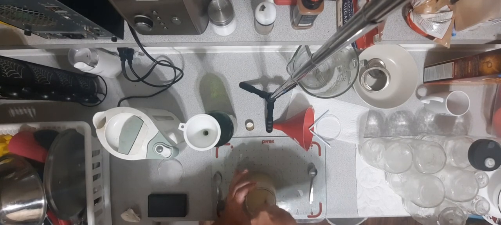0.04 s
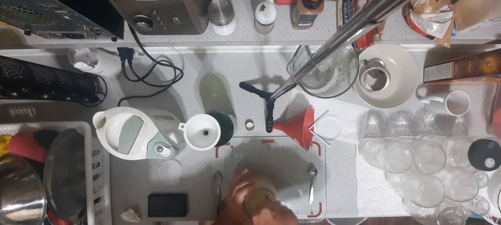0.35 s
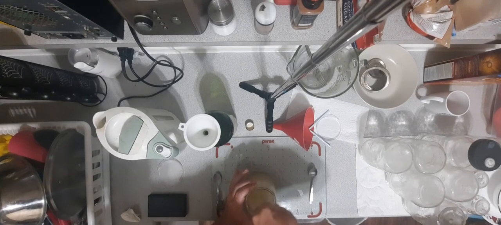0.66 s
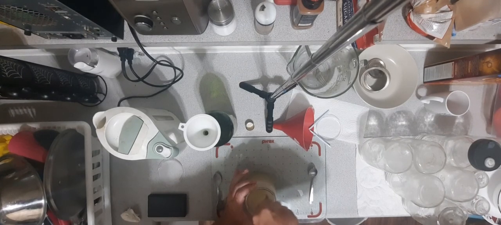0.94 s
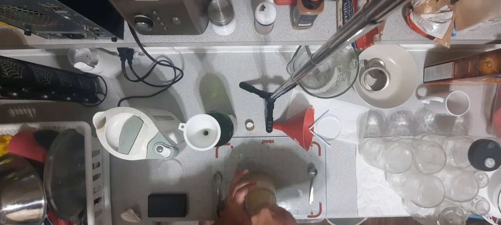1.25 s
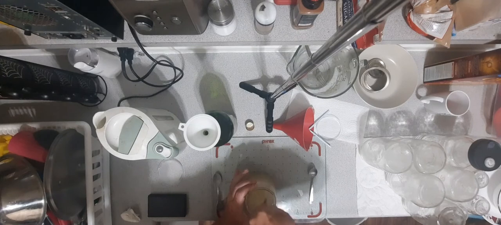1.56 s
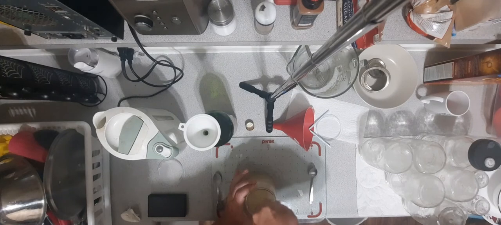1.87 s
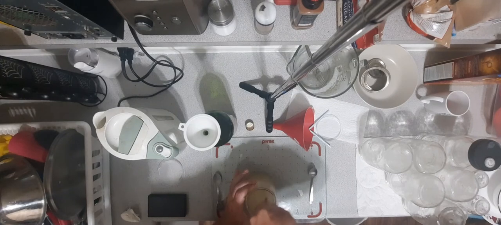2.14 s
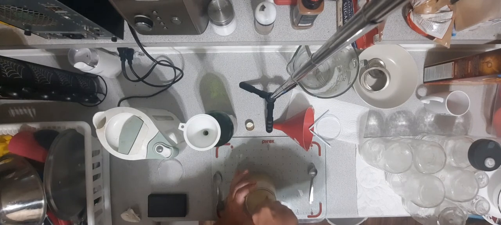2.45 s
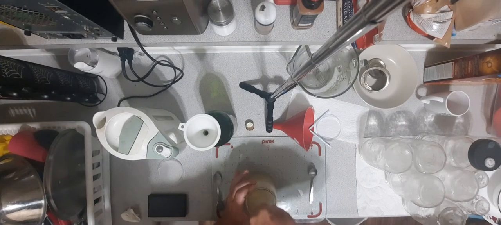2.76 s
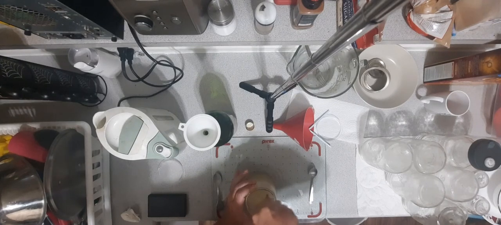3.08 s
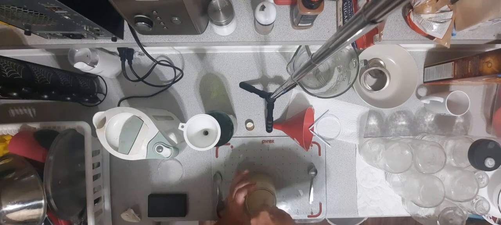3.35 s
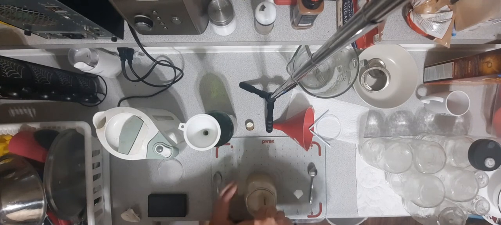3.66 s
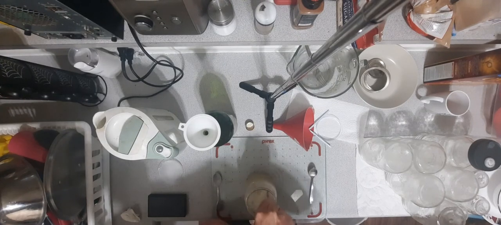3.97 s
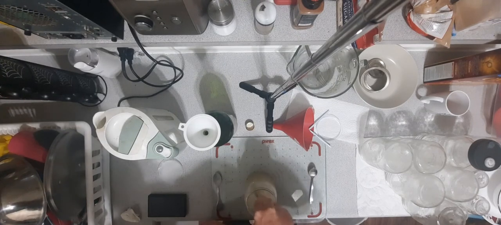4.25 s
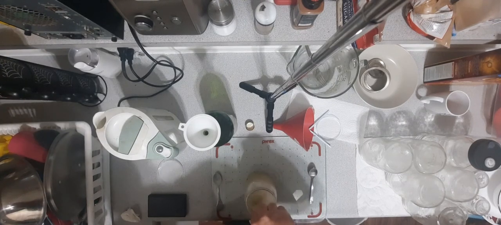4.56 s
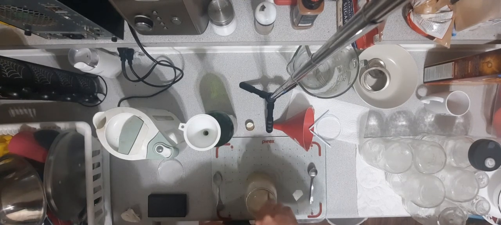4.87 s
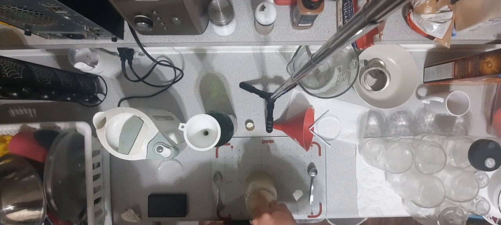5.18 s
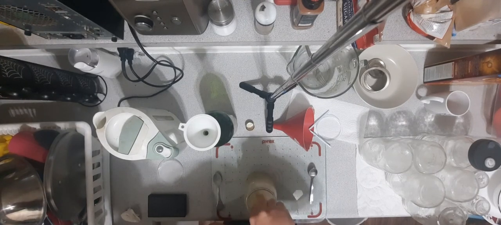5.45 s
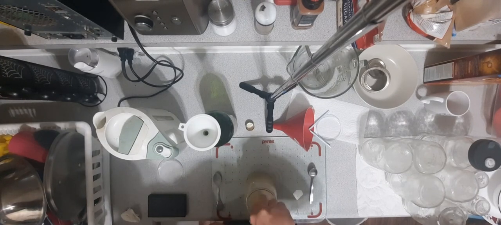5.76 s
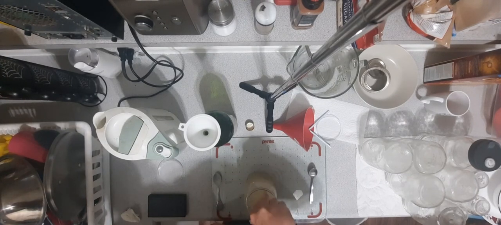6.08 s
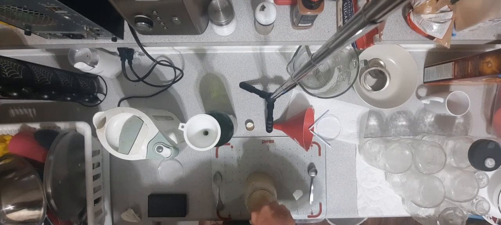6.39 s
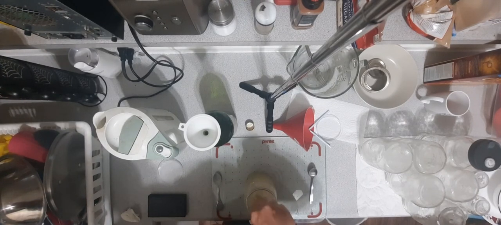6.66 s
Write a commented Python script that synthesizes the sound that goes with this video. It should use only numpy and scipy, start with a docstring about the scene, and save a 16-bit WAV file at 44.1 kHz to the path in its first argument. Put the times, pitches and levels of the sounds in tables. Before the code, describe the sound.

Liquid sloshes around in a glass jar, with hollow glugs, bubbles and drops slapping the glass. It settles, and after a short pause a metal spoon stirs quickly, knocking, scraping and clinking in the jar. The steel sink underneath booms softly with the waves and knocks. The sound is close, in a small, hard kitchen with a faint appliance hum.

```python
"""Glass jar in a steel sink

Churned liquid sloshes in a jar: trapped air glugs, bubbles ring, thrown drops slap the glass.
It settles, and after a pause a metal spoon stirs quickly, knocking, scraping and clinking.
Waves and knocks set the steel basin booming underneath. A hard little kitchen answers,
and an appliance hums faintly throughout."""
import sys
import numpy as np
from scipy import signal
from scipy.fft import rfft, irfft, next_fast_len
from scipy.io import wavfile
from scipy.ndimage import map_coordinates

SR = 44100
rng = np.random.default_rng(int(sys.argv[2]) if len(sys.argv) > 2 else 0)


def transcribe(signal):
    """Save signal, clipped to [-1, 1], as a 16-bit WAV file at the path in sys.argv[1]."""
    frames = np.atleast_2d(signal).T
    limited = np.clip(frames, -1, 1)
    pcm = np.round(limited * 32767).astype(np.int16)
    wavfile.write(sys.argv[1], SR, pcm)


N = 300762

# Cue levels are faders: each layer adds its own trim.
# how briskly the liquid swirls between waves, until it settles: time_s, level_db
SWIRL_LEVEL = [(0, -38.5), (.4, -44.5), (1.3, -39.5), (2.3, -44), (3.4, -41), (3.52, -50.5), (3.7, -77)]
# waves breaking on the jar's wall: start_s, hold_s, weight_db, splash_db, spray_db
WAVE_CUES = [(0.01, 0.022, -42, -32, -61), (0.14, 0.017, -34, -31, -35), (0.279, .01, -37, -34, -41),
             (0.335, 0.18, -34.5, -34, -38), (0.52, 0.017, -41, -49, -60), (0.744, 0.015, -36.5, -34, -63),
             (0.85, 0.015, -28, -32, -45), (0.874, .02, -45, -27, -45), (0.993, 0.0088, -30, -44, -56),
             (1.057, 0.072, -30.5, -37, -55), (1.228, 0.037, -32.5, -47, -52),
             (1.396, 0.022, -32.5, -30.5, -44), (1.594, 0.066, -34, -33, -57.5),
             (1.816, 0.14, -33.5, -34, -36), (2, 0.069, -36, -44, -50), (2.201, 0.039, -41, -37, -42),
             (2.387, 0.047, -33, -35, -38), (2.557, 0.0077, -32, -52, -59),
             (2.66, 0.023, -38.5, -34, -38.5), (2.852, 0.0078, -60, -58, -44), (3.03, 0.097, -39, -38, -51),
             (3.2, 0.036, -42, -32, -42), (3.256, 0.067, -36, -52, -43), (3.377, 0.011, -36.5, -31, -54)]
# fader ride of the wet crackle: time_s, level_db
CRACKLE_LEVEL = [(0, -46.5), (.35, -47.5), (.6, -54.5), (.8, -50), (1.1, -48), (2, -51), (2.75, -55),
                 (2.95, -49), (3.2, -45), (3.4, -48), (3.52, -64), (3.7, -85), (4.55, -85), (4.8, -57),
                 (5.3, -58), (5.6, -72), (6.8, -47)]
# thrown liquid hitting the glass: start_s, slap_db, snap_db, spit_db
SPLAT_CUES = [(.02, -39.5, -58, -57), (.147, -37.5, -44, -50), (0.159, -46, -54, -49),
              (0.232, -34.5, -47, -66), (0.279, -42, -40.5, -54), (.294, -34.5, -39.5, -51),
              (0.344, -44, -47, -58), (0.357, -37.5, -45, -44.5), (.528, -44, -55, -54.5),
              (.578, -58, -57, -68), (.733, -43, -47.5, -53), (0.852, -39, -43, -40.5),
              (.866, -32.5, -39, -37.5), (.896, -36, -39, -39.5), (1.054, -55, -56, -51.5),
              (1.235, -45, -50, -46.5), (1.265, -41.5, -51, -67), (1.389, -46, -50, -61),
              (1.407, -40, -47, -60), (1.443, -40, -45, -62), (1.548, -49, -55, -51),
              (1.686, -57, -50.5, -56.5), (1.805, -32, -34.5, -41.5), (1.839, -36, -39, -50),
              (2.003, -39, -45, -42.5), (2.022, -36, -47, -62), (2.07, -46, -51, -51),
              (2.2, -33.5, -38, -47), (2.225, -37, -36.5, -50), (2.36, -39, -54, -57),
              (2.4, -33.5, -37.5, -44.5), (2.421, -37, -41, -60), (2.657, -44, -45, -44.5),
              (2.859, -54, -45.5, -48.5), (3.046, -44, -42.5, -46.5), (3.181, -41, -41, -52),
              (3.275, -50, -50, -46.5), (3.336, -35, -49, -55), (3.393, -39, -46, -53),
              (3.413, -42, -47.5, -51)]
# the swirl closing on a pocket of air: start_s, level_db, pitch_hz
GLUG_CUES = [(0.118, -39, 842), (0.147, -22.5, 842), (0.231, -20, 832), (0.257, -31, 866),
             (0.314, -26, 880), (0.347, -28.5, 860), (0.428, -27, 830), (0.509, -28, 840),
             (0.534, -33, 820), (0.614, -29, 827), (0.696, -29, 818), (0.732, -31.5, 856),
             (0.868, -31.5, 753), (1.186, -26, 837), (1.261, -23, 849), (1.407, -28, 804), (1.45, -27, 860),
             (1.628, -28.5, 798), (1.762, -30.5, 824), (1.86, -42, 855), (2.021, -30, 730),
             (2.07, -33.5, 820), (2.148, -26.5, 830), (2.367, -35, 835), (2.43, -32, 830),
             (2.633, -28, 805), (2.815, -35, 830), (2.86, -30, 814), (2.938, -28, 814), (3.011, -30.5, 840),
             (3.045, -30.5, 840), (3.115, -29, 800), (3.153, -27, 826), (3.267, -24.5, 832),
             (3.334, -35, 710)]
# air pockets breaking into bubbles: start_s, length_s, centre_hz, level_db
GURGLE_CUES = [(0.277, 0.021, 1900, -36.5), (0.548, 0.016, 1870, -49), (1.021, .022, 1570, -41),
               (1.262, 0.022, 1920, -50), (1.37, .045, 2210, -38), (1.569, 0.063, 1590, -44),
               (1.97, 0.023, 1390, -33), (2.568, 0.022, 1450, -42), (2.945, 0.055, 1600, -37),
               (3.122, 0.044, 1400, -41), (3.203, 0.02, 2020, -38.5)]
# single bubbles ringing above the rest: start_s, pitch_hz, level_db
PLIP_CUES = [(.278, 1580, -37), (.668, 1290, -44), (1.025, 1580, -36.5), (1.772, 2070, -35),
             (1.806, 1336, -31.5), (1.982, 2530, -41.5), (2.199, 1580, -31.5), (2.779, 1580, -44),
             (2.965, 1620, -39), (3.16, 1580, -39), (3.311, 2000, -40), (3.328, 1980, -40),
             (3.41, 1570, -36)]
# heavy waves and hard knocks jolting the jar against the basin: start_s, boom_db
JOLT_CUES = [(0.869, -37), (1.603, -38), (1.843, -43), (4.805, -40), (5.085, -38.5), (5.228, -49),
             (5.41, -44), (5.561, -57), (5.859, -54)]
# spoon on glass; hollow, wall and hardness are relative to the strength:
# start_s, strength_db, hollow_db, wall_db, hardness_db, hollow_hz
KNOCK_CUES = [(4.582, -59.5, 12, -7, -4, 785), (4.625, -53, -5, -18, -8, 830),
              (4.702, -58.5, 22, 7, -10, 820), (4.79, -29, 5, -5.5, -9, 842),
              (5.005, -45, -8, -14.5, -7, 830), (5.078, -27, -1, -10, 1.5, 870),
              (5.218, -33, 1, -26, -4, 1032), (5.346, -36.5, -0.5, 4, 0.5, 880),
              (5.401, -33.5, 3.5, 0, -2.5, 1018), (5.48, -51.5, 17.5, 0, -14, 833),
              (5.515, -28.5, 3, -10, -2.5, 1008), (5.56, -26, 5, 7.5, 1, 804), (5.564, -27.5, 3, 6, 1, 820),
              (5.576, -34, 5, 2, 0, 830), (5.639, -30, -8, -6, -5, 836), (5.703, -31, -8, -1, -2, 990),
              (5.81, -25, 1, -3.5, -8.5, 1030), (5.852, -29.5, 8, 8.5, -2.5, 802),
              (5.858, -30, 2, 8, -5, 820), (5.871, -54, 11, -6, -2, 830), (5.9, -36.5, -6, -7, -2.5, 830),
              (5.961, -33, 0, 8, 2, 1010), (6.048, -30.5, -1.5, -8, -8.5, 890),
              (6.069, -31.5, 2.5, -14, -8, 849), (6.153, -34, 3, 0, -4, 864),
              (6.202, -33, 13, 0.5, -2, 850), (6.303, -30, -2.5, 0, -10, 810),
              (6.388, -37, -3, -5, -11, 830), (6.401, -34, 4, -6, -0.5, 848),
              (6.448, -31.5, 14, 6.5, -3, 828), (6.548, -28, 4.5, -7, -8, 810),
              (6.638, -30, -5, -6, -4.5, 730), (6.645, -38.5, 11, 8, -1, 775),
              (6.689, -31, 14, 3, -1.5, 842), (6.777, -26, 10.5, -4, -7, 830),
              (6.793, -48.5, 26.5, 14, -12, 820), (6.804, -28, 2, -11, -20, 850)]
# the spoon dragging along the glass: start_s, length_s, level_db
SCRAPE_CUES = [(4.619, 0.036, -47.5), (4.816, 0.13, -48), (5.59, .05, -55), (5.886, 0.046, -51),
               (6.075, 0.037, -49), (6.138, 0.015, -34), (6.39, 0.032, -39), (6.593, 0.03, -47),
               (6.652, 0.03, -43)]
# the spoon bouncing back: start_s, tick_db
REBOUND_CUES = [(4.798, -41), (5.097, -37), (5.525, -46), (5.712, -53), (5.82, -38), (6.213, -38),
                (6.456, -35.5), (6.56, -53), (6.788, -39)]
# the spoon ringing freely: start_s, bowl_hz, ring_db
CLINK_CUES = [(5.578, 8230, -32), (5.867, 8296, -31), (6.552, 8600, -46), (6.701, 8877, -40)]

# the steel basin's panel resonances: centre_hz, width_hz, level_db
BASIN_MODES = [(102.4, 34, 2), (173, 43, -3.5), (188, 29, -12), (333.2, 54, 9.5), (444, 45, -7.5)]
# the air in the jar's hollow: pitch_ratio, level_db, t60_s
HOLLOW_MODES = [(1, 0, 0.044), (.89, -8, 0.038), (1.19, -9.5, 0.038)]
# the liquid-damped wall, the glass's upper ring and the steel spoon: pitch_hz, level_db, t60_s
WALL_MODES = [(1249, 2, 0.039), (1319, -8.5, 0.073), (1127, -3, 0.019)]
GLASS_MODES = [(1696, -3, 0.047), (1810, 9, 0.032), (2035, 9, 0.02), (2195, 3.5, 0.041), (2354, 1.5, 0.057),
               (2630, 2.5, 0.025)]
SPOON_MODES = [(4190, -0.5, 0.04), (6600, -7, 0.02), (7300, -2, 0.027), (11360, 4, 0.038),
               (12300, -9, 0.026), (13200, 0, 0.05), (13780, -5, .025), (14150, -9, .035)]

# tone colours of the noise layers: frequency_hz, level_db
ROOM_TONE_EQ = [(25, -49), (58, -18), (120, -12.5), (240, -14), (330, -2.5), (500, -15), (800, -17),
                (1150, -18.5), (2150, -18), (3000, -41), (6000, -46.5), (9000, -42.5), (14000, -45.5),
                (16000, -54)]
HUM_EQ = [(230, -27.5), (295, 11.5), (365, 1.5), (470, -36)]
CHURN_EQ = [(25, -53), (45, -3), (80, -3.5), (110, -2), (190, 3), (250, -3.5), (380, -1), (520, -5),
            (680, -5.5), (820, 4.5), (1050, -13), (1350, -9), (2000, -39)]  # body of the moving liquid
TICK_EQ = [(3000, -38), (5200, 1.5), (6500, 4), (8200, 0.5), (9500, -2), (12000, -0.5), (14500, -8),
           (16000, -15)]  # bright contact and fine mist
CLACK_EQ = [(300, -36.5), (700, 2), (1200, 1), (1700, 2), (2400, -5.5), (3000, -14), (4500, -35)]  # midrange of a hit on glass
SNAP_EQ = [(1700, -29.5), (2600, 0), (3300, 1), (4200, -1), (5200, -9.5), (7500, -35)]  # its sharp edge
SPIT_EQ = [(3500, -39), (5500, 3), (8000, 0), (12000, 0.5), (14500, -8), (16000, -16)]  # sizzle of drops and steel
THUD_EQ = [(35, -77), (90, -15.5), (150, -5.5), (210, -2.5), (330, -1), (480, -4), (800, -44.5)]  # weight under a glug or knock
BOOM_EQ = [(35, -61), (58, -11), (100, 1), (180, -2), (280, -3), (450, -42)]  # the basin's floor
RUSTLE_EQ = [(700, -20), (1600, 3), (4000, -24)]
SCRAPE_EQ = [(500, -32), (1000, 1), (1700, 8.5), (2600, 3.5), (4000, -5), (7000, -15), (12000, -35),
             (16000, -32)]  # steel rubbing wet glass

# the kitchen's reverb time: frequency_hz, t60_s
KITCHEN_DECAY = [(100, 1), (330, 0), (800, 0.61), (2000, 0.37), (5000, 0.44), (13000, 0.35)]
# the colour of its echo: frequency_hz, level_db
KITCHEN_EQ = [(100, 11.5), (330, 2), (550, 2), (850, -7), (1200, -7.5), (2000, -3.5), (5000, -3.5),
              (13000, -7)]
# how alike left and right are, for sounds in the room and for its air: frequency_hz, correlation
STEREO_LIKENESS = [(60, 0.92), (290, 0.97), (640, 0.49), (1400, 0.15), (3100, 0.015), (15000, 0.16)]
ROOM_TONE_LIKENESS = [(60, 0.86), (130, 0.77), (290, 0.77), (640, 0.36), (1410, -0.44), (3100, -0.065),
                      (6820, -0.0097), (15000, 0.093)]
# the jar's lean to the left: frequency_hz, left_over_right_db
JAR_PAN = [(60, 0.84), (300, 1.1), (700, 2.2), (2400, 2.9), (4500, 1.3), (9000, 1.2), (15000, 7)]


def amp(db):
    """Decibels to gain."""
    return 10 ** (np.asarray(db) / 20)


def unit(x):
    """Scale to rms 1."""
    return x / np.sqrt(np.mean(x ** 2) + 1e-20)


def punch(x):
    """Scale a hit to rms 1 over its first 15 ms."""
    return x / np.sqrt(np.mean(x[..., :int(.015 * SR)] ** 2) + 1e-20)


def along(points, hz):
    """Read a curve of (frequency_hz, value) points on a log frequency axis."""
    point_hz, values = np.transpose(points)
    return np.interp(np.log(hz + 1), np.log(point_hz + 1), values)


def wobble(knots_per_s):
    """A smooth random modulation curve."""
    knots = rng.standard_normal(int(N * knots_per_s / SR) + 4)
    return map_coordinates(knots, [np.arange(N) * knots_per_s / SR])


def filtered(x, response):
    """Apply a complex frequency response."""
    n = x.shape[-1]
    padded = next_fast_len(n + min(n // 2, 8192))
    return irfft(rfft(x, padded) * response(np.fft.rfftfreq(padded, 1 / SR)), padded)[..., :n]


def coloured(x, eq, size=4096):
    """Minimum-phase EQ: nothing rings ahead of an attack."""
    cepstrum = irfft(np.log(amp(along(eq, np.fft.rfftfreq(size, 1 / SR)))))
    fold = np.r_[1, np.full(size // 2 - 1, 2), np.zeros(size // 2)]
    kernel = irfft(np.exp(rfft(cepstrum * fold)))
    return signal.fftconvolve(x, kernel[None], axes=1)[:, :x.shape[1]]


def paired(x, likeness):
    """Blend two unrelated signals into a left and right of the given likeness."""
    turn = lambda hz: np.arccos(np.clip(along(likeness, hz), -1, 1)) / 2
    mid, side = filtered(x, lambda hz: np.array([np.cos(turn(hz)), np.sin(turn(hz))]))
    return np.array([mid + side, mid - side])


def stereo_noise(samples, likeness=STEREO_LIKENESS):
    """White noise, centred in the bass and wide in the treble."""
    return paired(rng.standard_normal((2, samples)), likeness)


def add(track, start_s, sound):
    """Drop a sound onto a stereo track."""
    first = max(round(start_s * SR), 0)
    n = min(sound.shape[1], N - first)
    track[:, first:first + n] += sound[:, :n]


def ring(modes, attack_s, scatter_db, width_rad, detune):
    """Damped modes, their pitch and strength varied from hit to hit by moving liquid and grip."""
    t = np.arange(SR // 8) / SR
    hz, db, t60_s = np.transpose(modes)[:, :, None]
    chance = rng.standard_normal((5, len(modes), 1))
    pitch_hz = hz * (1 + detune * chance[4])
    stereo_phase = chance[0] + width_rad * chance[1:3]
    decay = amp(db + scatter_db * chance[3] - 60 * t / t60_s)
    partials = decay * np.sin(2 * np.pi * pitch_hz * t + stereo_phase)
    return punch(partials.sum(1) * (1 - np.exp(-t / attack_s)))


def burst(eq, t60_s, uneven_db=0):
    """A puff of dense, fast-dying vibration; uneven_db gives each contact its own colour."""
    t = np.arange(SR // 8) / SR
    puff = coloured(stereo_noise(len(t)) * amp(-60 * t / t60_s), eq)
    ripple = np.clip(rng.standard_normal(64), -1.5, 1.5)
    return punch(filtered(puff, lambda hz: amp(uneven_db * map_coordinates(ripple, [126 * hz / SR]))))


def ambience():
    """Steady room tone with an appliance's fuzzy hum."""
    air = unit(coloured(stereo_noise(N, ROOM_TONE_LIKENESS), ROOM_TONE_EQ))
    hum = unit(coloured(stereo_noise(N), HUM_EQ))
    return amp(-54.5) * air + amp(-62) * hum


def swirl_db(t):
    """Level of the swirl at time t."""
    return np.interp(t, *np.transpose(SWIRL_LEVEL), right=-120)


def swells(rest_db, starts_s, peaks_db, holds_s, rise_s, ebb_db_per_s):
    """Gain envelope of waves that build, hold and ebb over a resting level."""
    t, power = np.arange(N) / SR, amp(rest_db) ** 2
    for start_s, peak_db, hold_s in np.broadcast(starts_s, peaks_db, holds_s):
        build = np.clip(1 + (t - start_s) / rise_s, 0, 1)
        ebb = amp(peak_db - ebb_db_per_s * np.maximum(t - start_s - hold_s, 0))
        power += (build * ebb) ** 2
    return np.sqrt(power)


def basin(x, wash):
    """The sink's steel panels resonate over a broad wash of the unfiltered sound."""
    def panels(hz):
        return sum(amp(db) * 1j * hz * width_hz / (centre_hz ** 2 - hz ** 2 + 1j * hz * width_hz)
                   for centre_hz, width_hz, db in BASIN_MODES)
    return filtered(x, lambda hz: wash + panels(hz))


def churn():
    """The liquid's weight rumbles through the basin, swelling with each wave."""
    starts_s, holds_s, weight_db, _, _ = np.transpose(WAVE_CUES)
    calm_db = swirl_db(np.arange(N) / SR)
    envelope = swells(calm_db, starts_s, weight_db, holds_s, rise_s=0.024, ebb_db_per_s=196)
    surge = stereo_noise(N) * amp(3.15 * wobble(45))
    return amp(-1.5) * envelope * unit(basin(coloured(surge, CHURN_EQ), wash=0.77))


def bubbles(per_s, centre_hz, spread_octaves, cycles, scatter_db, rise, samples):
    """A stream of tiny damped tones at rms 1; rise bends each one upward."""
    when, pitch, strength, side = rng.random((int(per_s * N / SR), 4)).T[:, :, None]
    hz = centre_hz * 2 ** (spread_octaves * (2 * pitch - 1))
    age = np.arange(samples) / SR * hz / cycles
    gain = amp(-scatter_db * np.log(1 - .98 * strength)) * np.sqrt(centre_hz / hz)  # a few stand out
    envelope = gain * np.exp(-3 * age) * (1 - np.exp(-age * cycles * 2))
    phase = 2 * np.pi * cycles * age * (1 + rise * np.minimum(age, 2) / 2)
    slots = ((when * N).astype(int) + np.arange(samples)).ravel()
    channels = [envelope * np.sin(phase + width_rad * (side - .5)) for width_rad in (-2, 2)]
    return unit(np.array([np.bincount(slots, tones.ravel(), N + samples)[:N] for tones in channels]))


def froth():
    """Each wave folds a rush of bubbles into the liquid."""
    starts_s, _, _, splash_db, _ = np.transpose(WAVE_CUES)
    calm_db = swirl_db(np.arange(N) / SR) - 10.5
    envelope = swells(calm_db, starts_s, splash_db - 9.5, holds_s=0, rise_s=0.0073, ebb_db_per_s=120)
    return envelope * bubbles(per_s=330, centre_hz=1452, spread_octaves=0.98, cycles=21,
                              scatter_db=6, rise=0.13, samples=900)


def spray():
    """Each wave throws up ticking droplets and a hiss of mist."""
    starts_s, _, _, _, spray_db = np.transpose(WAVE_CUES)
    calm_db = swirl_db(np.arange(N) / SR) - 24.5
    envelope = swells(calm_db, starts_s, spray_db - 10, holds_s=0, rise_s=0.0043, ebb_db_per_s=175)
    droplets = bubbles(per_s=260, centre_hz=8570, spread_octaves=0.92, cycles=5,
                       scatter_db=3.5, rise=0, samples=60)
    mist = unit(coloured(rng.standard_normal((2, N)), TICK_EQ))
    return envelope * (amp(-2.5) * droplets + amp(-7) * mist)


def crackle():
    """Small bubbles burst in clumps while the liquid moves."""
    level_db = np.interp(np.arange(N) / SR, *np.transpose(CRACKLE_LEVEL))
    pops = bubbles(per_s=650, centre_hz=2195, spread_octaves=1.07, cycles=9.4,
                   scatter_db=3.5, rise=0.13, samples=300)
    clumps = amp(9.9 * np.tanh(wobble(45)))
    return amp(level_db) * unit(pops * clumps)


def splats():
    """Thrown liquid slaps the glass with a ringing clack, a snap and a fine spit of drops."""
    out = np.zeros((2, N))
    for start_s, slap_db, snap_db, spit_db in SPLAT_CUES:
        clack = amp(slap_db - 1.5) * burst(CLACK_EQ, t60_s=0.033, uneven_db=0.5)
        wall = ring(WALL_MODES, attack_s=0.0005, scatter_db=7, width_rad=0.5, detune=0.039)
        snap = amp(snap_db) * burst(SNAP_EQ, t60_s=0.025, uneven_db=4.5)
        spit = amp(spit_db) * burst(SPIT_EQ, t60_s=0.041, uneven_db=4)
        add(out, start_s, clack + amp(slap_db - 9) * wall + snap + spit)
    return out


def glugs():
    """Closing air pockets sound the jar's hollow; lesser glugs fill in as long as the swirl lasts."""
    out, spacing_s = np.zeros((2, N)), .085
    beats_s = np.arange(0, SWIRL_LEVEL[-1][0], spacing_s)
    lesser = [(beat_s + spacing_s * late, swirl_db(beat_s) + 6 - 7 * weak, 720 + 200 * high)
              for beat_s, (late, weak, high) in zip(beats_s, rng.random((100, 3)))]
    for start_s, db, hz in list(GLUG_CUES) + lesser:
        air_modes = [(hz, 0, 0.032), (1.198 * hz, -6, .018), (0.803 * hz, -7, .018)]
        hollow = ring(air_modes, attack_s=0.0053, scatter_db=1.5, width_rad=0.15, detune=0.021)
        add(out, start_s, amp(db - 3.5) * hollow + amp(db - 12.5) * burst(THUD_EQ, t60_s=0.043))
    return out


def gurgles(count=11, scatter_octaves=0.87, climb_octaves=0.2, cycles=18):
    """An air pocket breaks into a run of short-lived bubbles that tends to climb in pitch."""
    out, t = np.zeros((2, N)), np.arange(SR // 25) / SR
    for start_s, length_s, centre_hz, db in GURGLE_CUES:
        for k, (late, high, weak) in enumerate(rng.random((count, 3))):
            progress = (k + late) / count
            hz = centre_hz * 2 ** (scatter_octaves * (high - .5) + climb_octaves * (progress - .5))
            envelope = amp(-60 * t * hz / cycles) * (1 - np.exp(-t * hz))
            phase = 2 * np.pi * hz * t * (1 + 5 * t) + 0.98 * rng.standard_normal((2, 1))
            bubble = punch(envelope * np.sin(phase))
            add(out, start_s + progress * length_s, amp(db - 7 - 14 * weak) * bubble)
    return out


def plips(cycles=42, rise_per_s=0.6, jostle_rad=.04):
    """A larger bubble rings for a few dozen cycles, jostled by the swirl as it nears the surface."""
    out, t = np.zeros((2, N)), np.arange(SR // 16) / SR
    for start_s, hz, db in PLIP_CUES:
        envelope = amp(-60 * t * hz / cycles) * (1 - np.exp(-t * hz / 2))
        phase = 2 * np.pi * hz * t * (1 + rise_per_s * t) + .5 * rng.standard_normal((2, 1))
        phase += jostle_rad * np.cumsum(rng.standard_normal(len(t)))
        add(out, start_s, amp(db - 2.5) * punch(envelope * np.sin(phase)))
    return out


def jolts():
    """The jar bumps the basin's floor into a soft, low boom."""
    out = np.zeros((2, N))
    for start_s, boom_db in JOLT_CUES:
        add(out, start_s, amp(boom_db - 8) * burst(BOOM_EQ, t60_s=0.11))
    return basin(out, wash=0.38)


def rustle(peak_s=4.155, width_s=.032):
    """A soft, brief rustle in the pause."""
    hiss = unit(coloured(rng.standard_normal((2, N)), RUSTLE_EQ))
    return amp(-59) * hiss * np.exp(-((np.arange(N) / SR - peak_s) / width_s) ** 2)


def knocks():
    """The spoon rings the jar's hollow and glass and thuds into the basin; hard hits are brighter."""
    out, thuds = np.zeros((2, N)), np.zeros((2, N))
    for start_s, db, hollow_db, wall_db, hardness_db, hollow_hz in KNOCK_CUES:
        air_modes = [(ratio * hollow_hz, level_db, t60_s) for ratio, level_db, t60_s in HOLLOW_MODES]
        hollow = ring(air_modes, attack_s=0.0011, scatter_db=1, width_rad=0.45, detune=0.009)
        wall = ring(WALL_MODES, attack_s=0.00039, scatter_db=1.5, width_rad=0.33, detune=0.011)
        glass = ring(GLASS_MODES, attack_s=0.000083, scatter_db=5.5, width_rad=0.95, detune=0.0065)
        clack_db = db - 0.37 * hardness_db
        body = amp(db + hollow_db) * hollow + amp(db + wall_db - 2.5) * wall + amp(clack_db - 3) * glass
        clack = amp(clack_db - 4) * burst(CLACK_EQ, t60_s=0.033, uneven_db=-1)
        snap = amp(db + 0.85 * hardness_db + 1) * burst(SNAP_EQ, t60_s=0.038, uneven_db=1)
        tick = amp(db + hardness_db - 1.5) * burst(TICK_EQ, t60_s=0.043, uneven_db=3)
        add(out, start_s, body + clack + snap + tick)
        # a faint, soft clack of noise starts 4 ms before each knock
        add(out, start_s - .004, amp(clack_db - 13.5) * burst(CLACK_EQ, t60_s=0.07))
        # the hand cushions the jar, so the thud grows more slowly than the knock
        thud_db = min(-10.5 + 0.73 * db + 0.24 * hollow_db + 0.28 * wall_db, db)
        add(thuds, start_s, amp(thud_db - 7.5) * burst(THUD_EQ, t60_s=0.1))
        add(out, start_s, amp(min(thud_db, -38.5) - 4) * basin_note())  # capped on heavy thuds
    return out + basin(thuds, wash=0.39)


def basin_note(pitch_hz=333, t60_s=0.47, attack_s=0.0077):
    """The basin's floor hums on after a thud: its longest-lived note, in mono."""
    t = np.arange(SR // 2) / SR
    envelope = amp(-60 * t / t60_s) * (1 - np.exp(-t / attack_s))
    note = envelope * np.sin(2 * np.pi * pitch_hz * rng.normal(1, 0.013) * t)
    return np.array([note, note])


def scrapes(slips_per_s=390, fade_db=16):
    """The spoon sticks and slips along the wet glass, easing off through each stroke."""
    out = np.zeros((2, N))
    for start_s, length_s, db in SCRAPE_CUES:
        progress = np.linspace(0, 1, int(length_s * SR))
        grip = np.interp(progress * length_s * slips_per_s, np.arange(200), rng.random(200))
        stroke = np.minimum(1, 8 * progress * (1 - progress)) * amp(-fade_db * progress + 19 * grip)
        rub = coloured(stereo_noise(SR // 4)[:, :len(stroke)] * stroke, SCRAPE_EQ)
        add(out, start_s, amp(db) * unit(rub))
    return out


def clinks():
    """The spoon bounces with a tick; at times its steel rings, the bowl's note shifting with grip."""
    out = np.zeros((2, N))
    for start_s, tick_db in REBOUND_CUES:
        add(out, start_s, amp(tick_db) * burst(TICK_EQ, t60_s=0.042, uneven_db=5.5))
    for start_s, bowl_hz, ring_db in CLINK_CUES:
        modes = SPOON_MODES + [(bowl_hz, 2, .04)]
        steel = ring(modes, attack_s=0.0019, scatter_db=6, width_rad=0.44, detune=0.001)
        sizzle = burst(SPIT_EQ, t60_s=0.06, uneven_db=7)
        add(out, start_s, amp(ring_db + 3) * steel + amp(ring_db - 7) * sizzle)
    return out


def kitchen(x, blocks=30):
    """Each side of the jar gets its own bounce and tail, renewed block by block as the jar moves."""
    out, step = np.zeros((2, N)), N // blocks + 1
    for start in range(0, N, step):
        for side in x:
            hz, t, noise = signal.stft(rng.standard_normal((2, SR * 2 // 5)), SR, nperseg=256)
            fade = amp(-60 * t / along(KITCHEN_DECAY, hz)[:, None]) * (1 - np.exp(-t / 0.00057))
            fade *= 1 + 0.18 * np.exp(-((t - .015) / 0.0036) ** 2)  # early bounce at 15 ms
            fade /= np.sqrt(2 * np.sum(fade ** 2, 1, keepdims=True) * t[1] * SR)  # equal band energy
            bands = noise * fade * amp(along(KITCHEN_EQ, hz))[:, None]
            tail = paired(signal.istft(bands, SR, nperseg=256)[1], STEREO_LIKENESS)
            add(out, start / SR, signal.fftconvolve(side[None, start:start + step], tail, axes=1))
    return out


def scene():
    """The mix: jar, sink and kitchen echo sit a little to the left, over the room tone."""
    rumble = churn()
    liquid = froth() + spray() + crackle() + splats() + glugs() + gurgles() + plips()
    near = liquid + rustle() + scrapes() + clinks() + jolts()
    direct = amp(-4) * (near + knocks())
    # a knock radiates unevenly, so the walls get a mix of modes of their own
    echo = amp(-3) * kitchen(near + knocks())
    side, left_lead_s = np.array([[.5], [-.5]]), .00002
    pan = lambda hz: amp(side * along(JAR_PAN, hz)) * np.exp(2j * np.pi * hz * side * left_lead_s)
    return filtered(direct + echo + rumble, pan) + ambience()


def record(dry):
    """Master EQ: roll off the deepest bass and cut the very top steeply."""
    low_cut_hz, high_cut_hz = 33, 15800
    low_cut = lambda hz: hz ** 2 / np.sqrt(hz ** 4 + low_cut_hz ** 4)
    high_cut = lambda hz: 1 / np.sqrt(1 + (hz / high_cut_hz) ** 160)
    return filtered(dry, lambda hz: low_cut(hz) * high_cut(hz))


dry = scene()
out = record(dry)
transcribe(out)
```